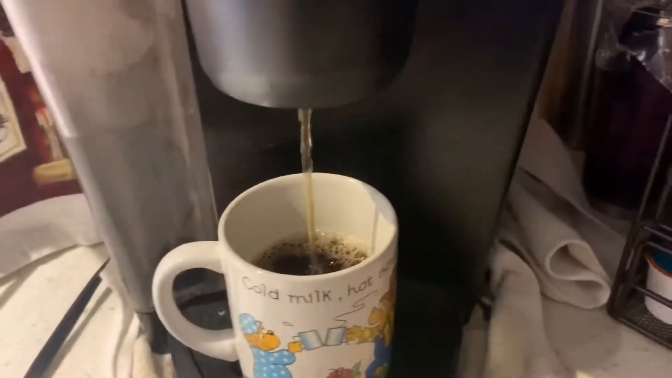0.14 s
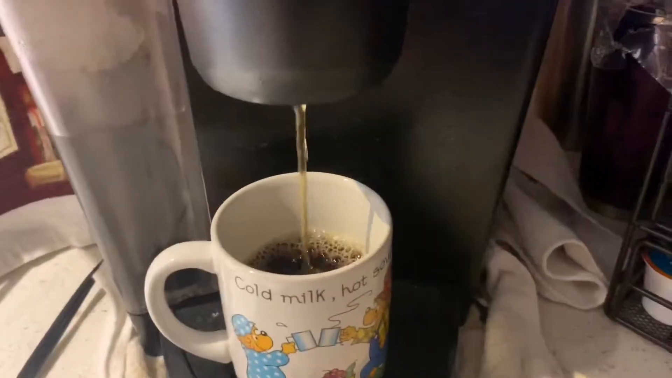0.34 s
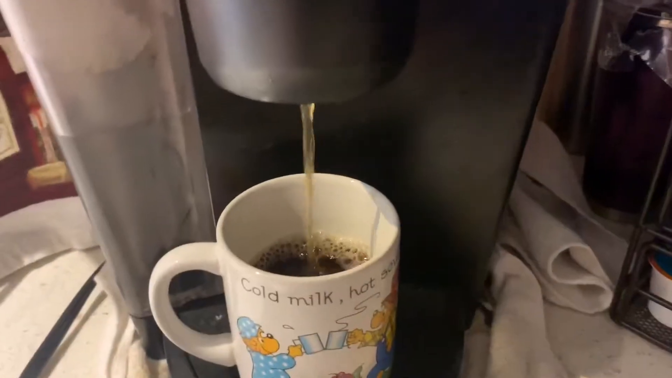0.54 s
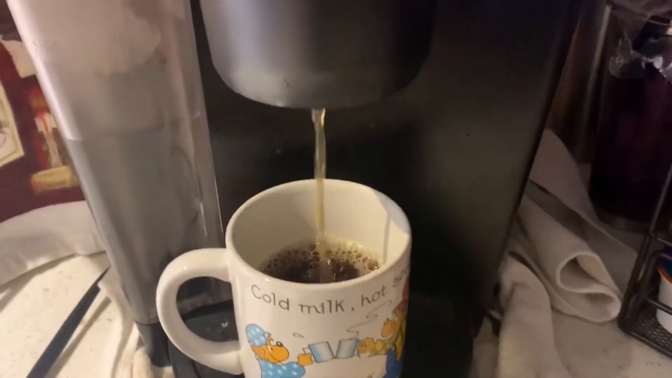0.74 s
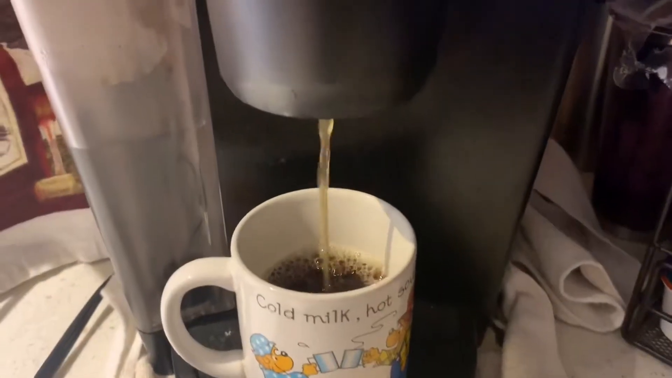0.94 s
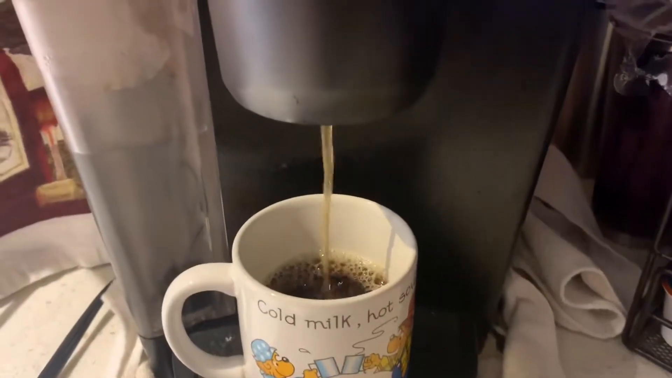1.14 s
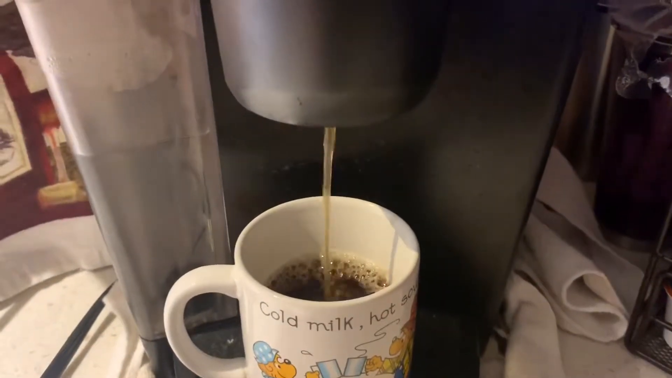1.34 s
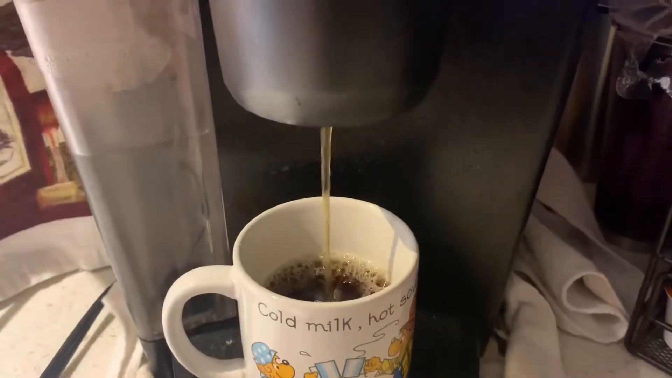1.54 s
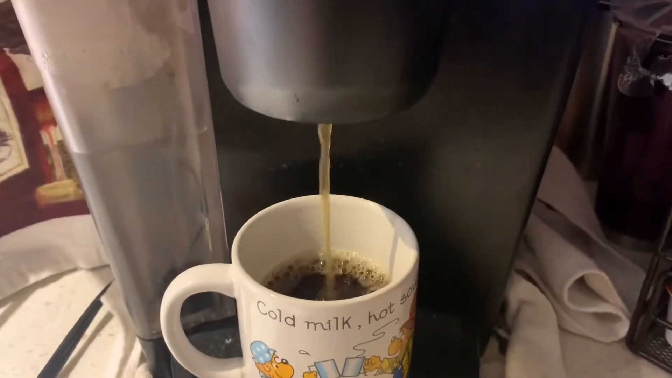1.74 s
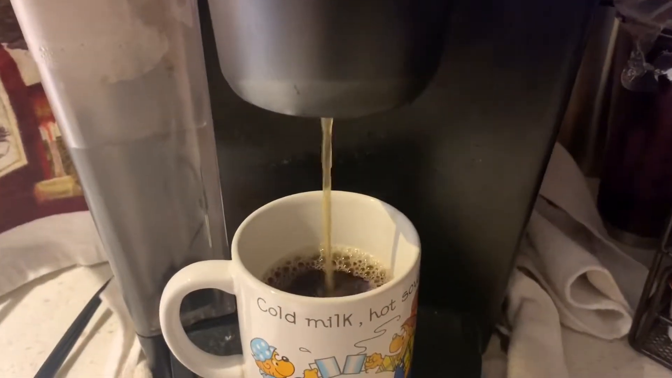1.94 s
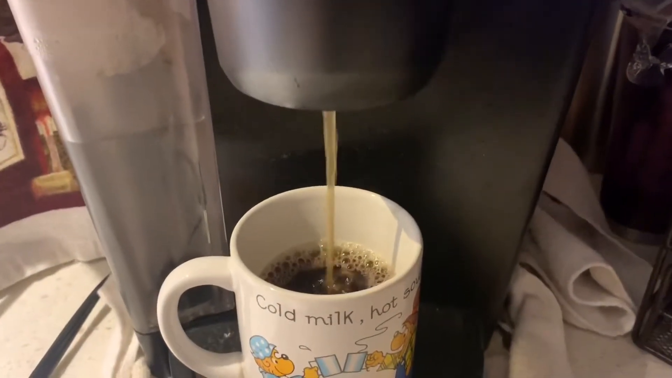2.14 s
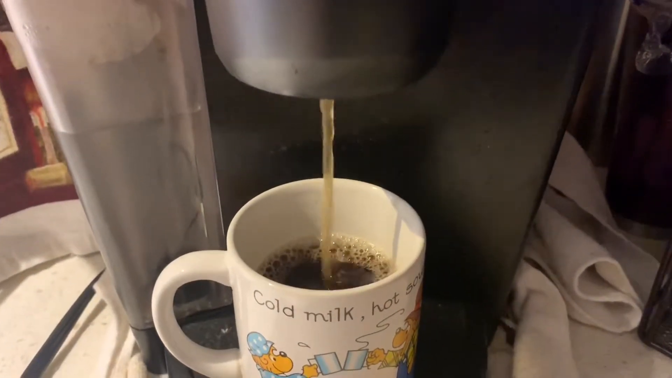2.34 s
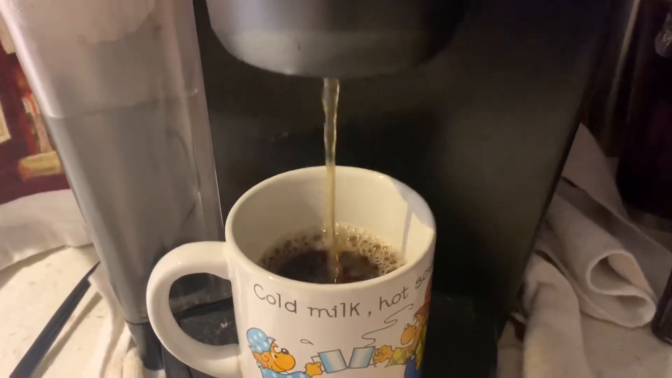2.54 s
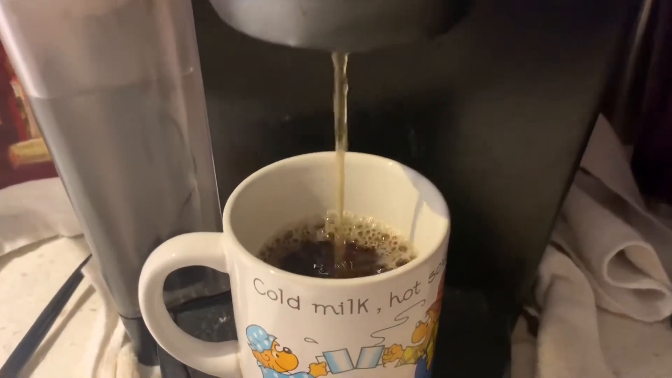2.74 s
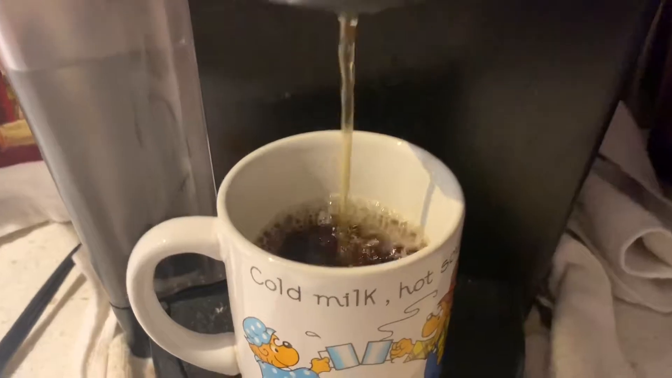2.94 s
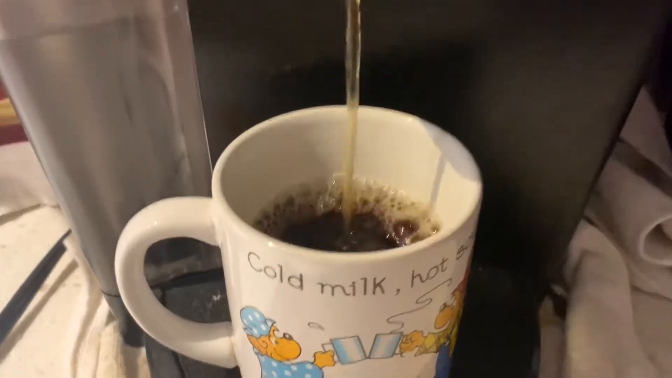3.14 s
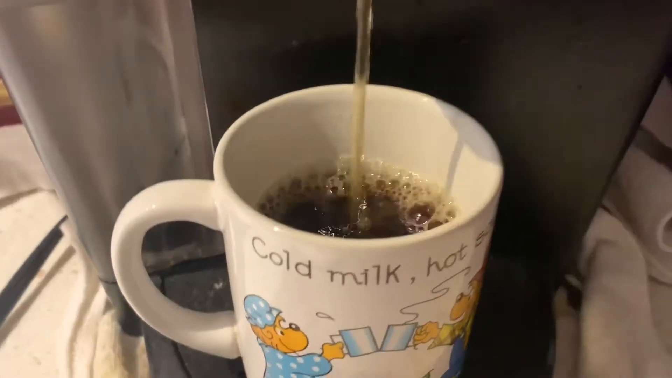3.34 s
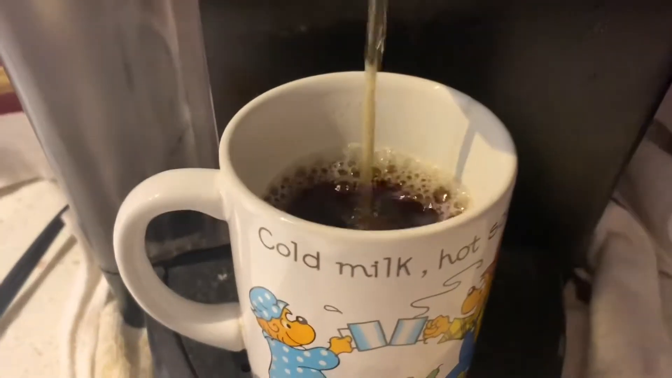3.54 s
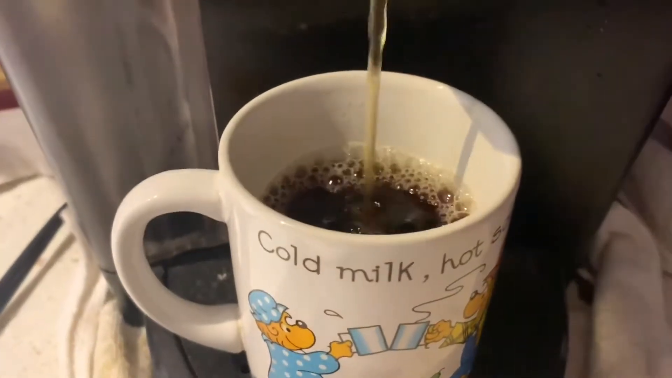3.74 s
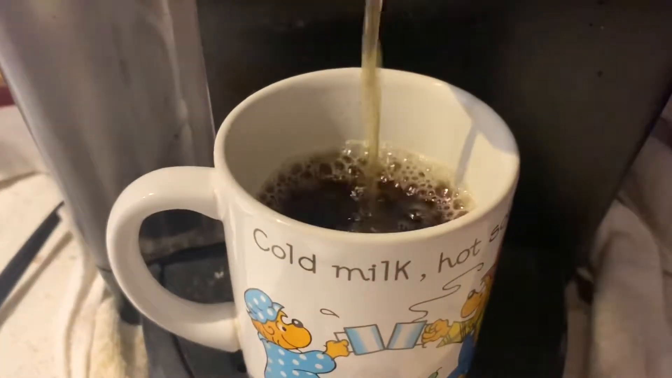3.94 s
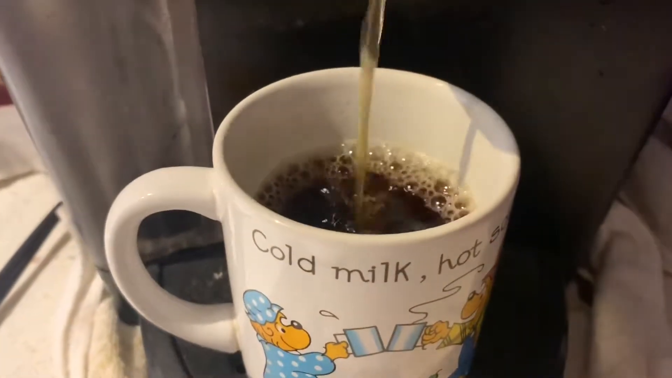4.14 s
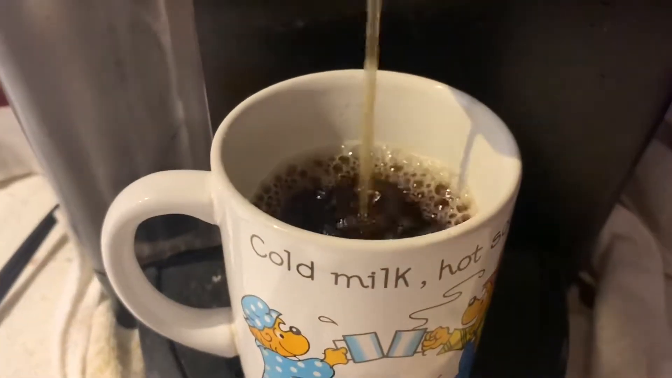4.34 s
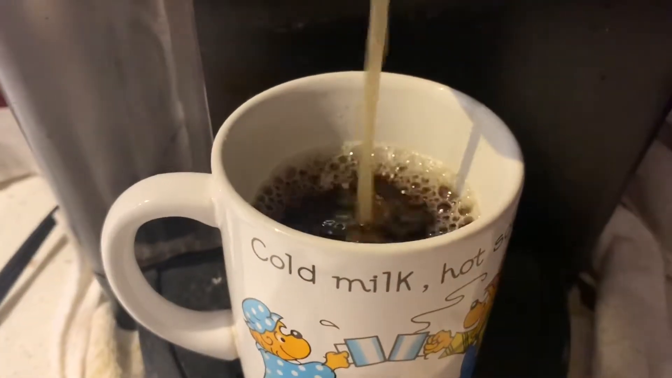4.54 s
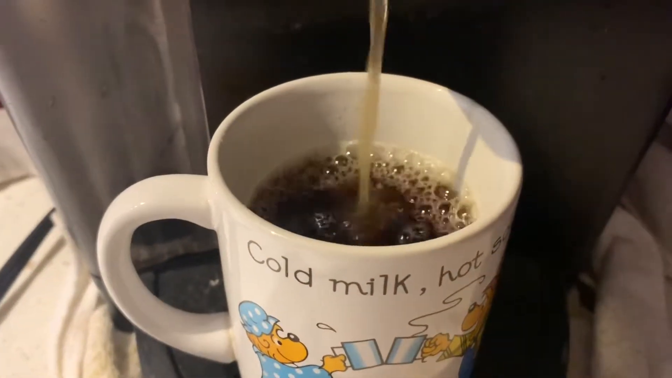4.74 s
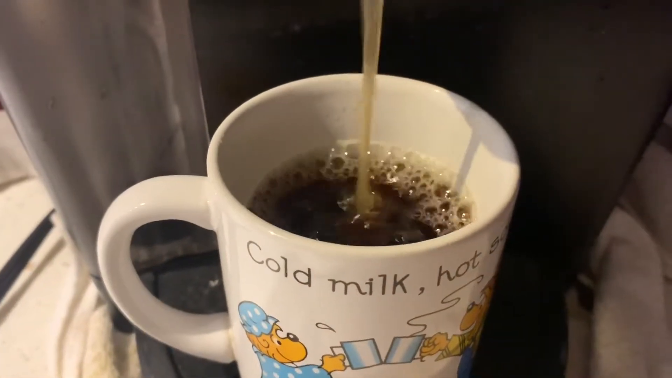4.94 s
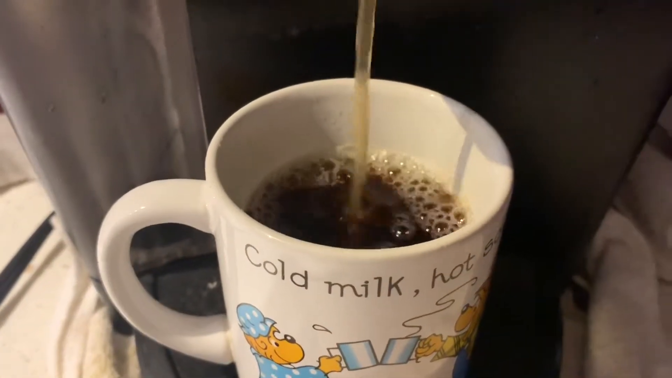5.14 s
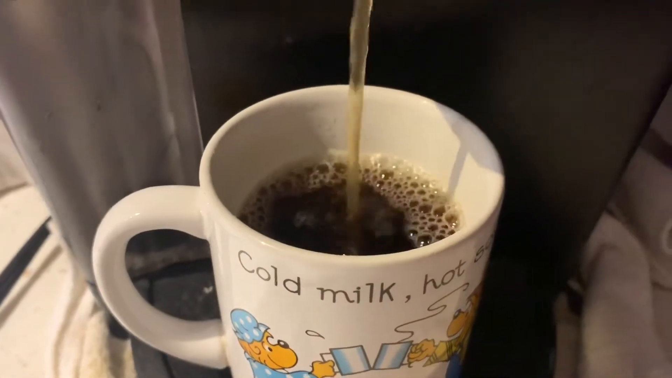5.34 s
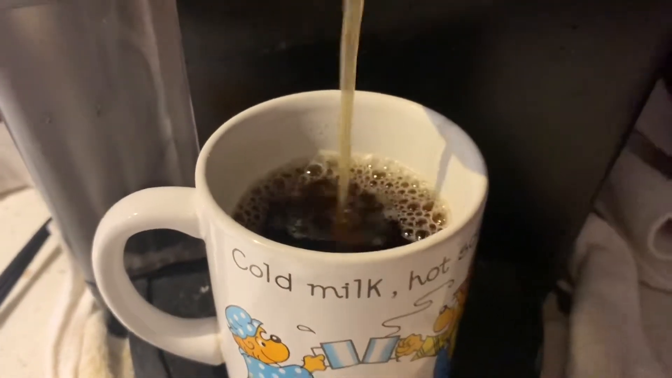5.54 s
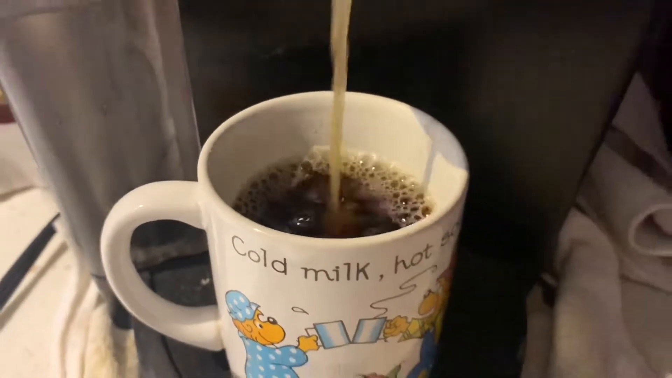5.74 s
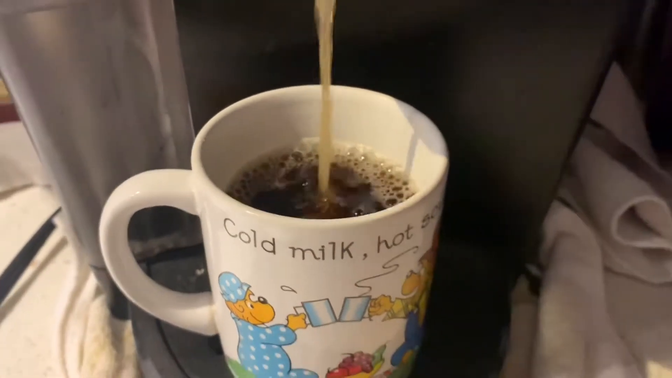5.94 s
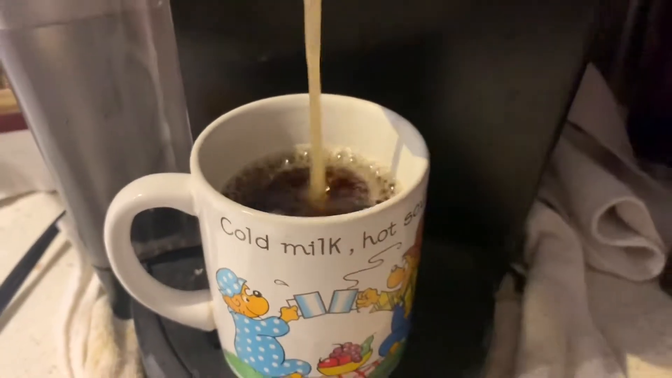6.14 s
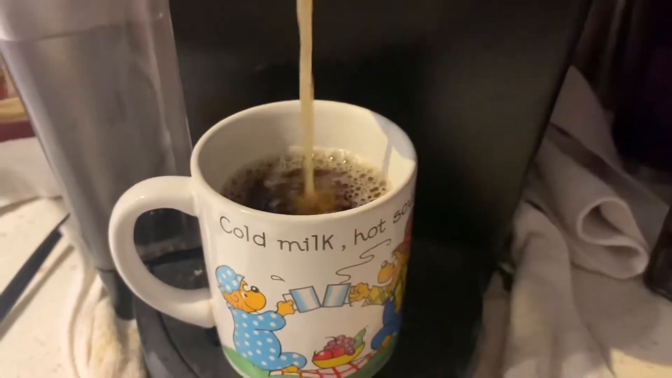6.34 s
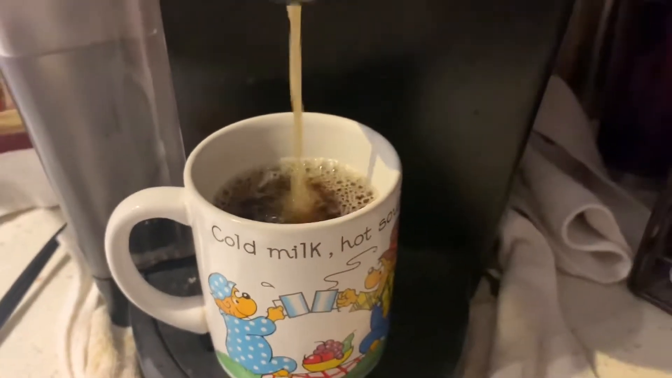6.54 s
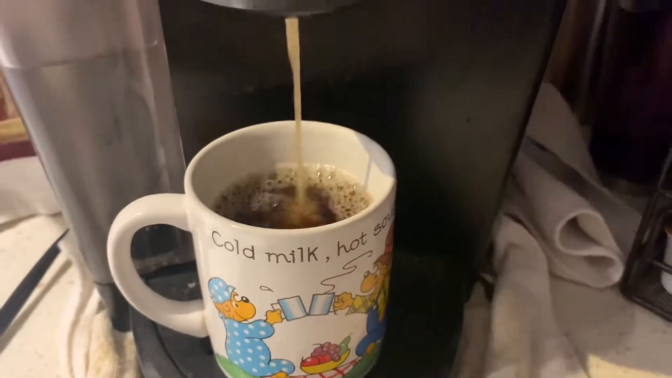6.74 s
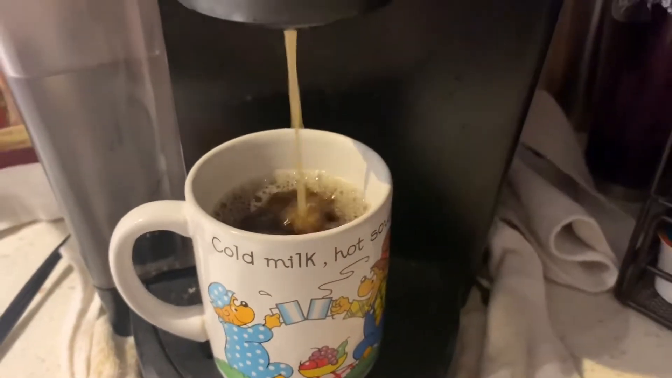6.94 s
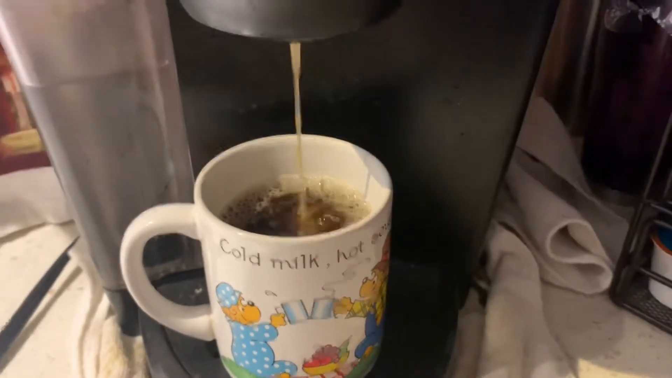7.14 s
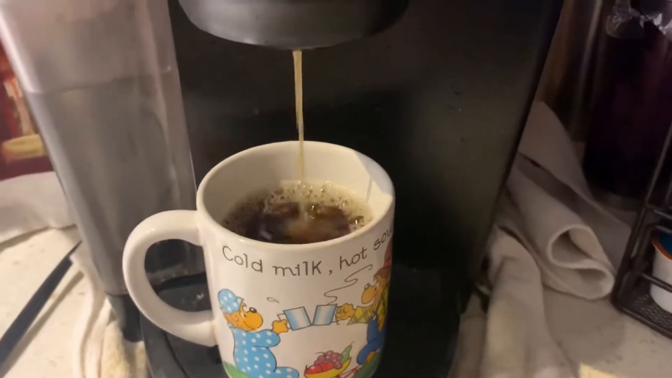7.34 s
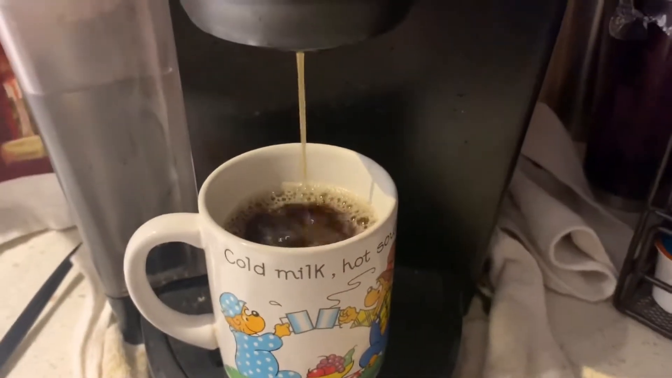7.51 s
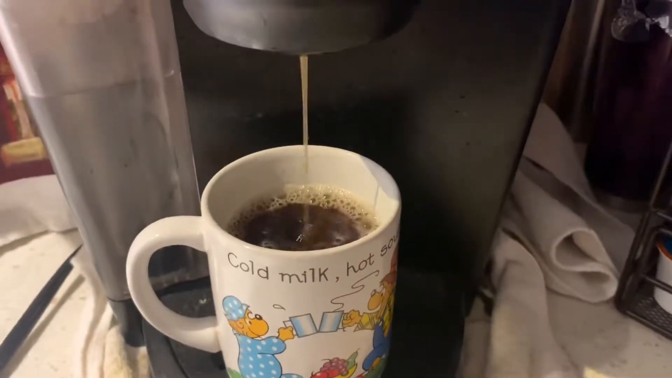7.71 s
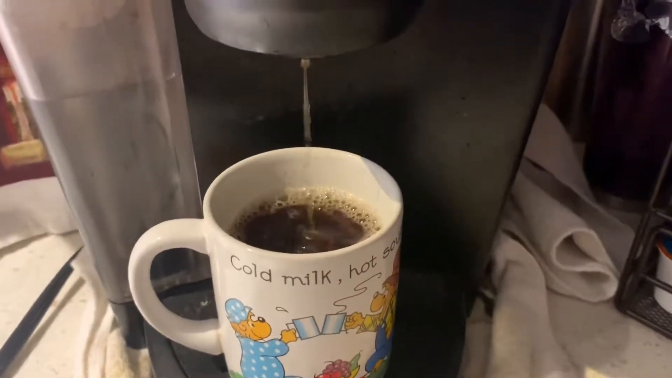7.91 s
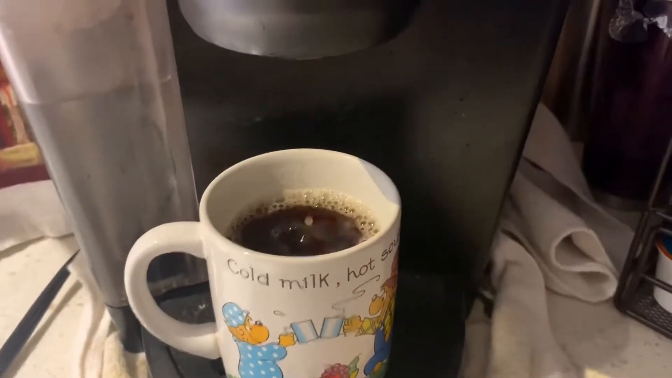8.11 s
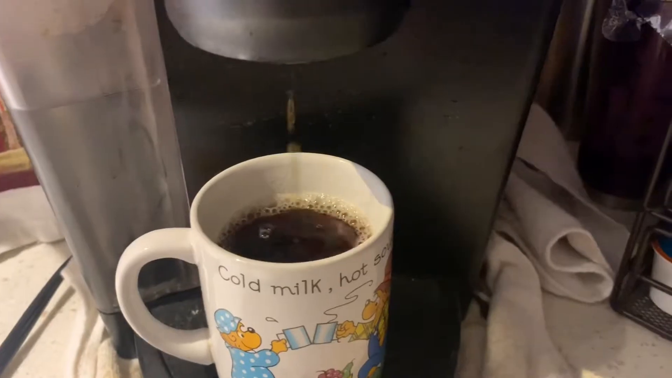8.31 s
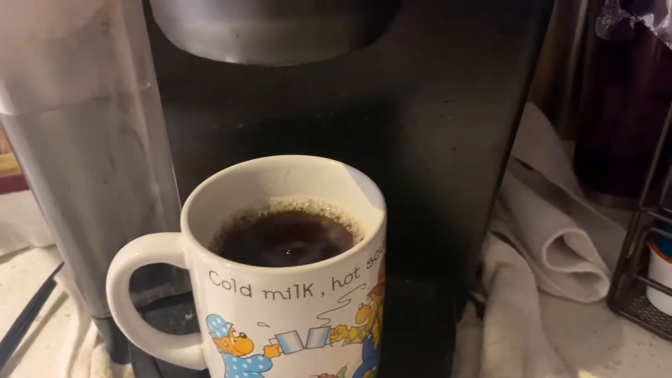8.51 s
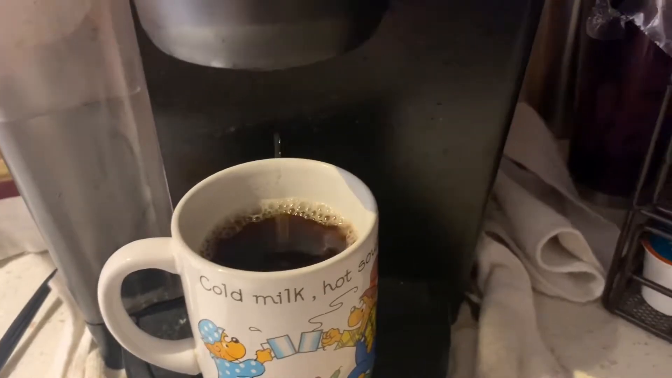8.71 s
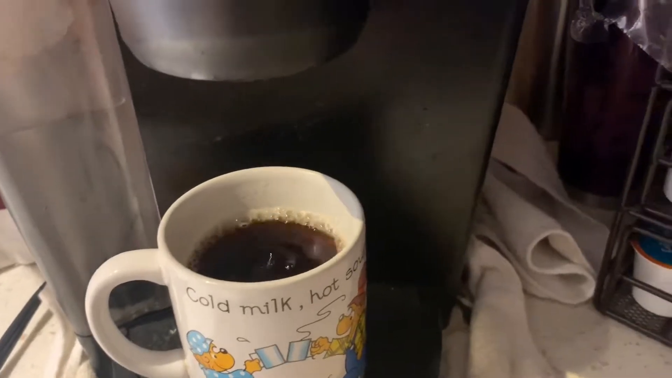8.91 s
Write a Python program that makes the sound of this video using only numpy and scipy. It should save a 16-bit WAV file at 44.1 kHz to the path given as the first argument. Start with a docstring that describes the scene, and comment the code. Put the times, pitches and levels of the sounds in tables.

```python
"""Pod coffee maker finishing a brew

A thin stream falls into a ceramic mug: trapped bubbles ring as plops and patter while foam films tick.
Air then blows the pod dry: filtered noise spits grow into a sputter of random pops ringing the spout,
with gliding gulps on top; it stops abruptly while last drops fall and a diaphragm pump purrs on as
periodic knocks and chirps. A low feed drone and shaped room noise lie beneath, heard at two ports."""
import sys
import numpy as np
from scipy import signal
from scipy.fft import rfft, irfft
from scipy.io import wavfile
from scipy.ndimage import uniform_filter1d, map_coordinates

SR = 44100
rng = np.random.default_rng(int(sys.argv[2]) if len(sys.argv) > 2 else 0)


def unload_wav(signal):
    """Save mono or channel-first audio to the path in sys.argv[1] as 16-bit WAV at rate SR, clipped to [-1, 1]."""
    wavfile.write(
        sys.argv[1],
        SR,
        np.round(np.clip(np.atleast_2d(signal).T, -1, 1) * 32767).astype(np.int16),
    )


N = 399987

# Event and resonance levels are relative: trims, filters and the ports act on them later.
# air blowing the pod dry swells, eases and stops: t/s, level/dB, spray hiss relative to it/dB
PURGE = [(5.697, -31, -20.5), (5.89, -31.5, -17), (6.06, -22, -16), (6.21, -20.5, -10.5),
         (6.3, -21.5, -8.5), (6.6, -20.5, -13), (6.9, -22, -8), (7.13, -22, -11.5), (7.664, -26, -11),
         (7.709, -38, -20), (7.765, -48, -22)]
# air spitting through the spout: t/s, level/dB, hold/s
SPITS = [(4.136, -20.5, 0.019), (4.168, -17.5, 0.043), (4.18, -15, 0.0099), (4.24, -21, 0.0094),
         (4.3, -15.5, 0.021), (5.016, -26, 0.022), (5.131, -26.5, 0.0049), (5.163, -22.5, 0.0053),
         (5.34, -27.5, 0.0025), (5.385, -27.5, 0.016), (5.419, -17, 0.015), (5.444, -21, 0.027),
         (5.504, -16, 0.024), (5.545, -24.5, 0.016), (5.571, -20.5, 0.017), (5.598, -16, 0.011),
         (5.619, -14.5, 0.008), (5.689, -16.5, 0.021), (5.77, -16, 0.013), (5.819, -17, 0.005),
         (5.869, -17, 0.0023), (8.377, -31, 0.0089), (8.404, -33, 0.004), (8.724, -35.5, 0.0035),
         (8.777, -42.5, 0.0085)]
# the biggest bubbles blown at the spout during the sputter: t at their loudest/s, level/dB, f/Hz
GULPS = [(6.071, -14, 1053), (6.092, -12, 1232), (6.12, -29, 1040), (6.174, -7.5, 1036), (6.204, -6, 1071),
         (6.254, -9, 1020), (6.354, -6.5, 1058), (6.375, -14, 930), (6.522, -11, 1078), (6.587, -7, 1055),
         (6.616, -9.5, 1085), (6.665, -25, 1066), (6.697, -9, 1050), (6.729, -17, 1030), (6.827, -14, 1080),
         (6.874, -15, 1104), (6.911, -14, 1100), (6.934, -22, 954), (7.023, -17, 796), (7.091, -13, 978),
         (7.114, -19, 983), (7.211, -16, 800), (7.238, -22, 970), (7.43, -13, 970), (7.556, -16, 1120),
         (7.662, -17.5, 686)]
# last films bursting at the emptied spout: t/s, level/dB
BURSTS = [(7.781, -33), (7.791, -37), (8.384, -22), (8.407, -24), (8.7235, -24), (8.731, -43),
          (8.7755, -30), (8.783, -32.5)]
# resonances of the spout and the hollow under it: f/Hz, nominal width/Hz, level/dB
SPOUT = [(520, 60, -17.5), (682, 48, -2.5), (808, 52, -4), (957, 36, -0.5), (1058, 45, 1.5), (1232, 36, -5),
         (1395, 50, -12), (1540, 45, -6.5), (1850, 200, -25), (2116, 28, -11), (2400, 120, -14),
         (2560, 130, -12.5), (2750, 100, -13), (3060, 90, -25), (3330, 90, -19.5), (3760, 80, -19),
         (4200, 90, -24), (4600, 250, -32), (5100, 220, -32.5), (5610, 190, -34), (6150, 160, -31),
         (6680, 240, -30.5)]
# resonances colouring the fine spray: f/Hz, nominal width/Hz, level/dB
SPRAY = [(7780, 570, -6), (8340, 390, 2), (8890, 250, -0.5), (11890, 3200, -14.5), (14670, 580, -26)]
# the larger bubbles trapped by the stream: t/s, level/dB, f/Hz, splash relative to the bubble/dB
PLOPS = [(0.041, -33.5, 970, -7), (0.049, -30.5, 1370, -2), (0.09, -39, 970, -7), (0.13, -37, 713, 7),
         (0.415, -36, 835, 1), (0.452, -29.5, 675, 2), (0.456, -31, 2600, 2), (0.487, -33.5, 1980, -6),
         (0.506, -35, 2760, -1), (0.539, -30, 680, 1), (0.569, -31.5, 666, 2), (0.617, -33.5, 1540, 7),
         (0.644, -40, 1400, -8), (0.674, -34, 760, 5), (0.699, -30.5, 870, 5), (0.825, -33, 894, -2),
         (0.826, -33, 1900, -9), (0.902, -32, 900, 4), (1.0335, -28.5, 930, -5), (1.057, -25.5, 1060, 0),
         (1.072, -26, 1086, -8), (1.142, -29.5, 696, 2), (1.155, -29.5, 750, 7), (1.194, -30, 3900, -6),
         (1.272, -33, 1280, -6), (1.522, -27, 972, -2), (1.529, -26, 993, -10.5), (1.768, -33, 1340, -3),
         (1.77, -27, 2600, -4), (1.817, -29.5, 1120, -5.5), (1.839, -39, 1420, -8), (1.875, -37, 1030, -3),
         (1.956, -29.5, 702, 2), (1.967, -29, 1510, 1), (2.099, -30.5, 860, 2.5), (2.145, -37.5, 1330, 2),
         (2.258, -38, 800, 17), (2.269, -28.5, 1087, 6), (2.492, -27.5, 1420, -8), (2.518, -30.5, 1050, -4),
         (2.533, -32, 960, -4), (2.538, -34, 3800, -8), (2.641, -30, 920, -4), (2.707, -26.5, 672, -0.5),
         (2.793, -31, 690, 2), (2.857, -29.5, 1560, 2), (2.869, -24.5, 1080, 10), (2.911, -25.5, 880, -6),
         (2.917, -30, 905, -11), (2.942, -25.5, 1060, -1), (2.945, -27, 1790, -8), (3.171, -31.5, 1050, -6),
         (3.191, -31, 2670, -3), (3.211, -25.5, 870, 5), (3.306, -25, 1246, -4.5), (3.368, -31.5, 1040, -9),
         (3.381, -32, 870, -10), (3.396, -31, 1210, -2), (3.423, -30, 916, -1), (3.438, -24.5, 694, 3),
         (3.486, -31, 1150, -7), (3.505, -28, 1420, 5), (3.527, -30.5, 900, -6), (3.665, -34, 1160, -1),
         (3.727, -38, 1010, -4), (3.734, -22.5, 1016, -20), (3.737, -26, 1540, -9), (3.808, -28, 870, -8.5),
         (3.85, -36, 2360, -8), (3.869, -32.5, 3560, -9), (3.887, -26, 1226, -3.5), (3.968, -27.5, 890, -7),
         (4.02, -31.5, 1250, 1), (4.18, -18, 1095, -4), (4.303, -21, 915, 1), (4.379, -33, 660, -10),
         (4.429, -24.5, 790, -2), (4.456, -32, 1980, -7), (4.472, -32, 790, -10), (4.474, -38, 1990, -12),
         (4.528, -32, 1840, -12), (4.561, -22.5, 1360, 1), (4.609, -25, 2320, -11), (4.651, -39, 1820, -10),
         (4.715, -32, 1860, -2), (4.748, -33, 1830, -9), (4.754, -29.5, 660, -1), (4.776, -33, 2730, -6),
         (4.818, -32, 1250, 2), (4.88, -30, 2380, 1), (4.938, -37, 2000, -6), (4.955, -35, 1440, 7),
         (5.018, -25, 740, 2), (5.161, -27, 3250, -3), (5.165, -26.5, 668, -9), (5.224, -33, 1180, -1),
         (5.386, -21.5, 1014, -5), (7.791, -38.5, 1460, -7), (7.792, -37, 2580, -11), (7.941, -34, 790, -3),
         (7.973, -39, 2560, -11), (8.373, -33, 698, -7), (8.406, -39, 697, -13)]
# droplets flung against the mug's wall: t/s, level/dB
SPATTER = [(0.158, -23), (0.537, -31), (1.034, -23), (2.6405, -27), (2.9444, -26), (3.3071, -18),
           (3.44, -29), (3.967, -28), (4.379, -29), (4.5615, -26), (5.018, -26), (7.822, -35), (7.918, -34)]
# the stream's patter until the flow ends: t/s, level/dB
STREAM = [(0, -48), (2.5, -53.5), (3.35, -49), (4.8, -48), (7.7, -57), (8.0, -70)]
# resonances of the air in the mug: f/Hz, nominal width/Hz, level/dB
MUG = [(666, 56, 3.5), (920, 85, 0.5), (1090, 96, -0.5), (1500, 850, -2), (1900, 160, 5), (2450, 940, -5),
       (3430, 2200, -8.5), (7350, 2000, -21.5)]
# the loudest foam bubbles bursting: t/s, level/dB, f/Hz
TICKS = [(0.1448, -23, 11600), (0.342, -24.5, 11300), (0.3643, -28, 11600), (0.4145, -24, 11300),
         (0.505, -32, 11500), (0.537, -12.5, 11460), (0.608, -17.5, 8800), (0.6724, -33, 11100),
         (0.6975, -21.5, 11000), (0.823, -34.5, 8100), (0.9004, -27.5, 11600), (0.9218, -27, 11700),
         (1.021, -28, 7900), (1.2151, -24, 7700), (1.228, -16.5, 7240), (1.3054, -33, 11500),
         (1.394, -23, 11800), (1.42, -25.5, 11700), (1.6242, -28, 11700), (1.9627, -26, 11400),
         (1.988, -19.5, 7400), (2.0563, -28, 11600), (2.102, -27, 11300), (2.3835, -22.5, 5300),
         (2.478, -19.5, 11550), (2.563, -11.5, 11300), (2.488, -28, 6560), (2.642, -9.5, 11100),
         (2.7062, -26, 7500), (2.74, -25.5, 6800), (2.793, -13.5, 11250), (2.9113, -23, 7100),
         (2.943, -24, 6900), (3.19, -20.5, 11400), (3.211, -20.5, 11300), (3.306, -11.5, 15200),
         (3.368, -23.5, 11300), (3.422, -39, 6560), (3.44, -22, 7200), (3.505, -46, 6100),
         (3.529, -33, 7000), (4.137, -14.5, 11000), (4.153, -18.5, 7700), (4.19, -10.5, 11100),
         (4.273, -28, 11000), (4.2892, -21, 11700), (4.312, -17, 11500), (4.3795, -18.5, 11900),
         (4.882, -25.5, 7560), (4.914, -25, 8700), (5.0465, -22, 7800), (7.792, -32, 8600),
         (7.918, -37, 8600), (7.9731, -39.5, 9000)]
# air pump loudness: t/s, knock level/dB, valve chirp level/dB
PUMP_LEVELS = [(3.9, -85, -90), (4.15, -44, -57), (5.3, -46, -66), (7.0, -46, -59), (7.9, -50, -52),
               (8.2, -47.5, -52), (9.07, -48, -51.5)]
# air pump speed, faster once the pod is clear: t/s, stroke rate/Hz
STROKES = [(3.9, 25), (4.15, 31.5), (5.3, 32.7), (7.0, 31.2), (7.9, 33.5), (8.2, 33.68)]
# resonances of the pump housing: f/Hz, nominal width/Hz, level/dB
HOUSING = [(99.4, 14.4, -3.5), (221.3, 46, 2), (313, 87, -4), (508, 44, -4.5), (663.4, 43, -0.5),
           (797, 44, -5.5), (916, 12.5, -5.5), (1170, 36, -17), (1280, 21, -10), (1460, 41, -20),
           (1444, 28, -9), (2040, 33, -26), (2360, 22, -24), (2890, 34, -13)]
# resonances of the valve's chamber: f/Hz, width/Hz, level/dB
VALVE = [(1722, 26, 9), (1700, 560, -6)]
# soft, low gulps as the emptied line settles: t/s, level/dB, f/Hz
GLUGS = [(7.775, -37, 277), (7.937, -29, 260)]
# spectrum of the kitchen background: f/Hz, relative level per Hz/dB
KITCHEN = [(15, -47), (42, -3), (145, -9.5), (230, -1), (430, -14.5), (680, -15), (1000, -20.5),
           (1700, -25.5), (2800, -34.5), (3900, -44), (5400, -51.5), (8500, -46), (16000, -45)]
# the two microphone ports: f/Hz, left minus right/dB, left lag/ms, reflections relative to direct/dB
PORTS = [(197, -2, 0.028, -6.5), (670, 3, -0.012, -9), (970, 1.5, -0.13, -1.5), (1110, 7.5, -0.065, -5.5),
         (1250, 10, -0.17, -3), (1510, 9, -0.14, -5.5), (1970, 0, -0.18, -2.5), (2600, 3.5, -0.1, -1.5),
         (2850, -0.5, -0.13, 0.5), (3830, 1, -0.089, 2.5), (5570, -4.5, 0.13, 0), (6330, -0.5, 0.2618, 0.5),
         (16700, 0.5, 0.26, -20)]

T = np.arange(N) / SR  # time of each sample, s
TAPS = 8192  # length of every filter, samples
FREQS = np.maximum(np.arange(TAPS // 2 + 1) * SR / TAPS, 1)  # Hz
# 60 dB decay of a 1 kHz bubble under the stream and in still coffee; higher-pitched ones die sooner
STIRRED_T60_S, STILL_T60_S, RING_SLOPE = 0.035, 0.16, 0.95
# air seeps past the last liquid between these times
SEEP_FROM_S, SEEP_TO_S, SEEP_DB = 3.96, 5.6, -48.5
# the water feed drones evenly, then dies away
FEED_DB, FEED_END_S, FEED_FADE_DB_PER_S = -51, 4.9, 6
KITCHEN_DB, TOP_HZ = -45, 16600


def undb(db):
    """Amplitude ratio of a level in decibels."""
    return 10 ** (np.asarray(db) / 20)


def unit(x):
    """Normalisation to unit rms amplitude."""
    return x / np.sqrt(np.mean(x ** 2))


def curves(table):
    """Linear interpolation of each column of a time table at every sample."""
    s, *columns = np.transpose(table)
    return [np.interp(T, s, c) for c in columns]


def across(table):
    """Interpolation of each column over the logarithm of frequency."""
    hz, *columns = np.transpose(table)
    return [np.interp(np.log(FREQS), np.log(hz), c) for c in columns]


def during(start, end, fade):
    """A gate open from start to end, with linear fades outside."""
    return np.interp(T, [start - fade, start, end, end + fade], [0, 1, 1, 0])


def walk(rate):
    """A smooth random wander of unit rms, moving between about `rate` random values per second."""
    hold = max(int(SR / rate), 1)
    steps = np.repeat(rng.standard_normal(N // hold + 1), hold)
    return unit(uniform_filter1d(steps, hold)[:N])


def causal(gain):
    """Minimum phase: folding the cepstrum gives the causal impulse response of a gain curve."""
    cepstrum = irfft(np.log(gain + 1e-9))
    cepstrum[1:TAPS // 2] *= 2
    cepstrum[TAPS // 2 + 1:] = 0
    return irfft(np.exp(rfft(cepstrum)))


def body(modes, skirt):
    """Superposition of resonances by power; a larger skirt deepens the valleys between them."""
    power = 0
    for hz, width, db in modes:
        detuning = (FREQS / hz - hz / FREQS) * hz / width
        power = power + undb(db) ** 2 / (1 + detuning ** 2) ** skirt
    return causal(np.sqrt(power))


def through(x, response):
    """Convolution with an impulse response, keeping the length of x."""
    return signal.fftconvolve(x, response[:len(x)])[:len(x)]


def decay(t, t60):
    """Exponential damping: a fall of 60 dB in t60."""
    return np.exp(-np.log(1000) * t / max(t60, 1e-4))


def add(track, s, sound, db):
    """Superposition of one sound at time s, scaled to this peak level."""
    i = min(max(int(s * SR), 0), N - 1)
    track[i:i + len(sound)] += (undb(db) * sound / np.abs(sound).max())[:N - i]


def bubble(t, hz, t60, rise):
    """Damped bubble resonance, rising in pitch as the bubble nears the surface."""
    stretch = 1 + rise * t / max(t60, 1e-3) / 2
    return decay(t, t60) * np.sin(2 * np.pi * hz * t * stretch)


def drifting(x, share, rate):
    """Frequency modulation by a wandering time warp, which bends every resonance in x together."""
    bend = walk(rate)
    bend = bend - uniform_filter1d(bend, size=TAPS)  # no slow drift
    moments = np.arange(N) + np.cumsum(share * bend)
    return map_coordinates(x, [moments], order=3, mode="mirror")


def pops(rate, spread_db):
    """A random impulse train: dense bursting films of uneven size."""
    struck = rng.random(N) < rate / SR
    return unit(struck * rng.standard_normal(N) * undb(spread_db * rng.standard_normal(N)))


def sputter(spout, spray, seep_flutter_db=4, seep_hiss_db=-7, hiss_db=1.5, purge_db=0.87,
            flutter_db=0.26, flutter_rate=110, hiss_flutter_db=2, surge_db=0.6, surge_rate=24):
    """Impulsive excitation of resonances: air tears coffee into pops in the spout and hissing spray."""
    seep = undb(SEEP_DB) * during(SEEP_FROM_S, SEEP_TO_S, 0.014)
    seep = seep * unit(undb(seep_flutter_db * walk(45)))
    level_db, spray_db = curves(PURGE)
    blow = undb(level_db + purge_db) * during(PURGE[0][0], PURGE[-1][0], 0.018)
    flutter = unit(undb(flutter_db * walk(flutter_rate)))
    surging = pops(2000, 0.82) * undb(surge_db * walk(surge_rate))
    gargle = unit(drifting(through(surging, spout), share=0.008, rate=18))
    hiss = unit(through(pops(7600, 0.65) * undb(hiss_flutter_db * walk(150)), spray))
    # seeping and blowing air combine by power
    gargle_gain = np.hypot(seep, blow)
    hiss_gain = np.hypot(seep * undb(seep_hiss_db), blow * undb(spray_db + hiss_db))
    return flutter * (gargle * gargle_gain + hiss * hiss_gain)


def gulps(swell_s=0.0045, rise=0.049, rise_time=0.058, trim_db=-4.5):
    """A swelling, damped oscillator: a big bubble at the spout rings for a moment, gliding upward."""
    out, t = np.zeros(N), T[:TAPS // 2]
    swell = t ** 2 * np.exp(-t / swell_s)  # greatest at twice swell_s
    for s, db, hz in GULPS:
        ring = np.sin(2 * np.pi * hz * t * (1 + rise * (t / 2 - 2 * swell_s) / rise_time))
        add(out, s - 2 * swell_s, swell * ring, db + trim_db)
    return out


def spits(spout, spray, spray_db=-15, opening=0.0011, release_t60=0.054):
    """Turbulent noise bursts: coffee plugs open the spout quickly, hold, and release as droplets."""
    out, t = np.zeros(N), T[:TAPS]
    for s, db, hold in SPITS:
        envelope = decay(np.maximum(t - hold, 0), release_t60) * np.minimum(t / opening, 1)
        tear, mist = rng.standard_normal((2, TAPS)) * envelope
        add(out, s, unit(through(tear, spout)) + undb(spray_db) * unit(through(mist, spray)), db)
    return out


def bursts(spout, spray, spray_db=-11, spray_t60=0.008, soft_hz=1900):
    """Impulse response of the spout: a snapping film gives one softened knock and a pinch of spray."""
    out, t = np.zeros(N), T[:TAPS]
    knock = signal.lfilter(*signal.butter(1, min(soft_hz, SR / 4), fs=SR), spout)
    for s, db in BURSTS:
        mist = rng.standard_normal(TAPS) * decay(t, spray_t60)
        add(out, s, knock, db)
        add(out, s, through(mist, spray), db + spray_db)
    return out


def plops(mug, splash_t60=0.034, rise=0.047, trim_db=2.5, count=26, small_db=-43, small_spread_db=3.5,
          small_hz=1500, octaves=0.72, small_splash_db=2, pinch_s=0.0011, droplet_db=4):
    """Bubble resonance: each bubble pinches off and rings, and its droplets excite the mug's air."""
    out, t = np.zeros(N), T[:TAPS // 2]
    small = []  # scattered at random among the large ones until the purge
    for k in range(count):
        s = (k + rng.random()) / count * PURGE[0][0]
        db = small_db + small_spread_db * rng.standard_normal()
        hz = min(small_hz * 2 ** (octaves * rng.standard_normal()), SR / 8)
        small.append((s, db, hz, small_splash_db))
    attack = np.minimum(t / pinch_s, 1)
    for s, db, hz, splash_db in small + PLOPS:
        t60 = STIRRED_T60_S if s < STREAM[-1][0] else STILL_T60_S
        t60 = t60 * (hz / 1000) ** -RING_SLOPE
        grit, size = rng.standard_normal((2, len(t)))
        splash = through(grit * undb(droplet_db * size) * decay(t, splash_t60), mug)
        splash = splash * undb(splash_db) / np.abs(splash).max()
        add(out, s, attack * (bubble(t, hz, t60, rise) + splash), db + trim_db)
    return out


def spatter(mug):
    """Impulse response of the mug: a droplet slaps the wall and one sharp click rings the air."""
    out = np.zeros(N)
    for s, db in SPATTER:
        add(out, s, mug, db)
    return out


def patter(mug, count=2000, centre_hz=2200, octaves=1.0, cycles=20, spread_db=1.5, surge_db=2):
    """Random superposition of small, short-lived bubbles, surging as the stream breaks into beads."""
    out, t = np.zeros(N), T[:TAPS // 8]
    draws = zip(rng.random(count), rng.standard_normal(count), rng.exponential(size=count))
    for when, pitch, size in draws:
        hz = min(centre_hz * 2 ** (octaves * pitch), SR / 4)
        add(out, when * T[-1], bubble(t, hz, cycles / hz, 0.15), spread_db * min(size, 3))
    surging = out * undb(surge_db * walk(30))
    return unit(through(surging, mug)) * undb(curves(STREAM)[0])


def tick(grit, hz, t60, width=0.91, ring_t60=0.0037, ring=0.94):
    """Sudden release of a film: a very short band-passed crack, and the open cavity pings."""
    hz, t = np.clip(hz, 2000, .4 * SR), T[:len(grit)]
    band = signal.iirpeak(hz, max(1 / width, 1), fs=SR)
    crack = signal.lfilter(*band, grit * decay(t, t60))
    return crack + ring * bubble(t, hz, ring_t60, 0)


def foam(t60=0.0066, count=210, fizz_db=-45, spread_db=7.0, fizz_hz=9200, low_hz=5000, rarest=0.053):
    """Random film rupture: loud bursts, and a fizz of faint ones until the feed starts to fade."""
    out = np.zeros(N)
    for s, db, hz in TICKS:
        add(out, s, tick(rng.standard_normal(TAPS // 8), hz, t60), db)
    for when, size, pitch in rng.random((count, 3)):
        db = fizz_db - spread_db * np.log(max(size, rarest))  # few loud, many faint
        hz = fizz_hz * 2 ** (1.5 * (pitch - .5))
        add(out, when * FEED_END_S, tick(rng.standard_normal(TAPS // 8), hz, t60), db)
    return signal.sosfilt(signal.butter(2, low_hz, "high", fs=SR, output="sos"), out)


def air_pump(scatter_db=2.0, rasp_db=-44, chirp_hz=2150, fall_hz_per_s=125000, chirp_length=0.007):
    """Periodic excitation: each diaphragm stroke knocks the housing; its valve chirps downward."""
    rate, = curves(STROKES)
    knock_db, chirp_db = curves(PUMP_LEVELS)
    turns = np.cumsum(rate) / SR
    age = turns % 1 / rate  # seconds since the stroke
    offset = ((turns + .5) % 1 - .5) * SR / rate  # samples from the nearest stroke
    strokes = np.sinc(offset) * undb(scatter_db * walk(29))
    rasp = undb(rasp_db) * rng.standard_normal(N) * decay(age, 0.079)
    knock = unit(through(strokes + rasp, body(HOUSING, skirt=1.87)))
    opening = np.sin(np.pi * np.minimum(age / chirp_length, 1)) ** 2
    chirp = unit(opening * np.sin(2 * np.pi * age * (chirp_hz - fall_hz_per_s * age / 2)))
    chirp = unit(through(chirp, body(VALVE, skirt=1)))
    return knock * undb(knock_db) + chirp * undb(chirp_db)


def glugs(t60=0.069, rise=0.033, overtone=2.0, overtone_db=-9):
    """Damped low resonance: a slug of water in the line swells and dies, with a faint overtone."""
    out, t = np.zeros(N), T[:TAPS]
    for s, db, hz in GLUGS:
        low = bubble(t, hz, t60, rise)
        high = undb(overtone_db) * bubble(t, overtone * hz, t60, rise)
        add(out, s, t * (low + high), db)
    return out


def water_feed(hz=52, width_hz=13):
    """Narrow-band noise: one broad low resonance makes an unsteady drone inside the machine."""
    level_db = FEED_DB - FEED_FADE_DB_PER_S * np.maximum(T - FEED_END_S, 0)
    drone = through(rng.standard_normal(N), body([(hz, width_hz, 0)], skirt=0.83))
    return unit(drone) * undb(level_db)


def kitchen(side_db=-11, apart_hz=1400):
    """Diffuse room noise: the two channels are most alike in the bass, where wavelengths are long."""
    gain = undb(across(KITCHEN)[0])
    side_share = np.clip(FREQS / apart_hz, min(undb(side_db), 1), 1)
    mid = through(rng.standard_normal(N), causal(gain))
    side = through(rng.standard_normal(N), causal(gain * side_share))
    return undb(KITCHEN_DB) * np.array([mid + side, mid - side]) / np.std(mid)


def ports(x, nook_t60=.035, room_t60=.35, room_db=-21):
    """Interchannel level and delay at two ports, with reflections from machine nook and kitchen."""
    balance_db, lag_ms, echo_db = across(PORTS)
    t, lead, out = T[:TAPS], TAPS // 16, []
    for sign in (1, -1):  # left, right: each takes half the difference
        echoes = rng.standard_normal(TAPS) * (decay(t, nook_t60) + undb(room_db) * decay(t, room_t60))
        direct = np.exp(-1j * np.pi * FREQS * sign * lag_ms / 1000)
        paths = direct + undb(echo_db) * rfft(echoes / np.linalg.norm(echoes))
        # reflections spread the sound in time but leave its broad colour alone
        paths = paths / np.sqrt(uniform_filter1d(np.abs(paths) ** 2, size=25))
        response = np.roll(irfft(paths * undb(sign * balance_db / 2)), lead)
        out.append(signal.fftconvolve(x, response)[lead:lead + N])
    return np.array(out)


def scene():
    """Superposition of spout, mug and pump at the ports, over the feed drone and the kitchen."""
    mug, spout, spray = body(MUG, skirt=1.86), body(SPOUT, skirt=1.157), body(SPRAY, skirt=2.14)
    purge = sputter(spout, spray) + gulps() + spits(spout, spray) + bursts(spout, spray)
    pour = plops(mug) + spatter(mug) + patter(mug) + foam()
    machine = air_pump() + glugs()
    return ports(purge + pour + machine) + water_feed() + kitchen()


def record(dry):
    """Band limitation: a steep elliptic low-pass cuts the top of the treble."""
    return signal.sosfilt(signal.ellip(8, .2, 70, TOP_HZ, fs=SR, output="sos"), dry)


dry = scene()
out = record(dry)
unload_wav(out)
```